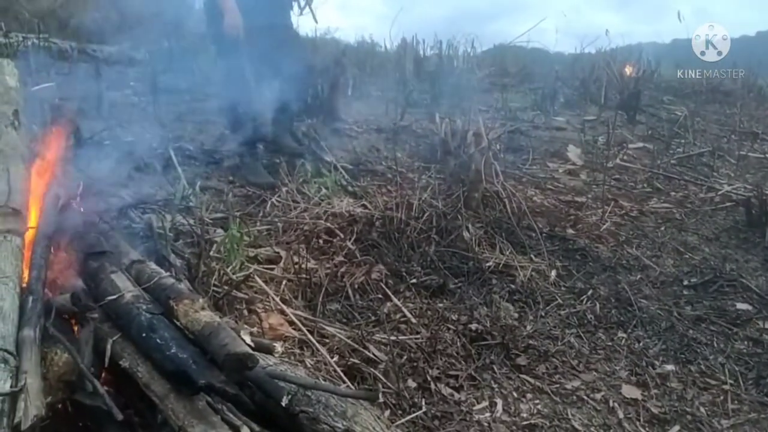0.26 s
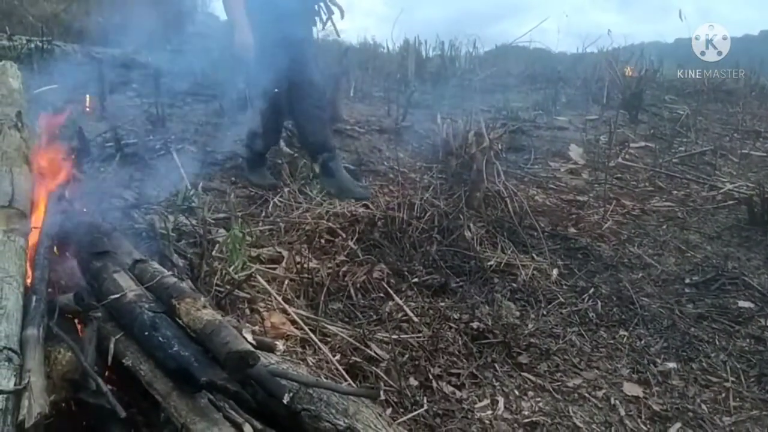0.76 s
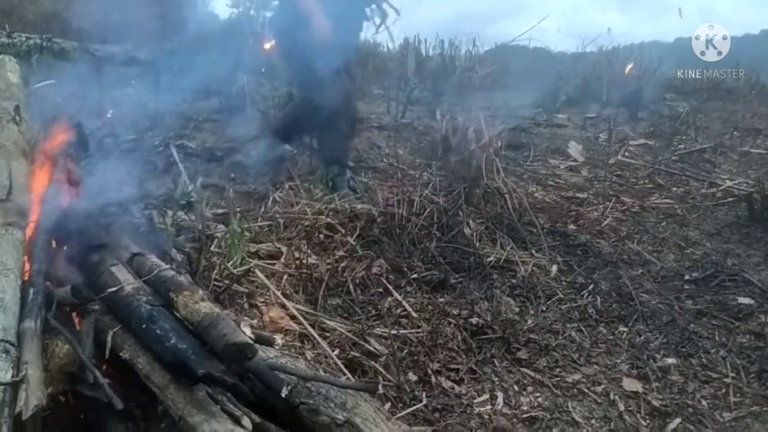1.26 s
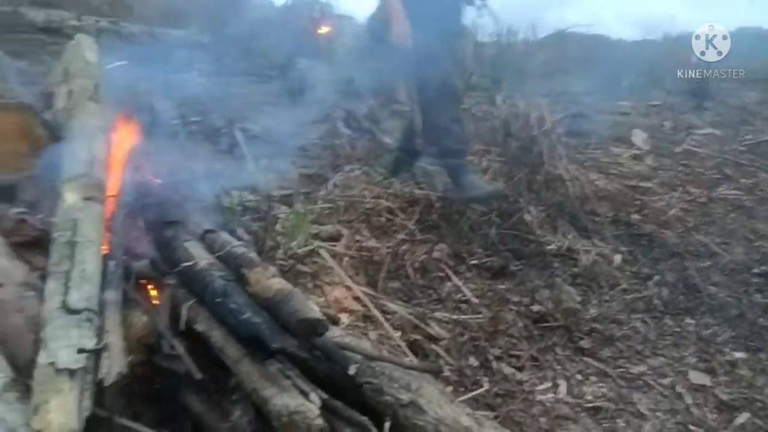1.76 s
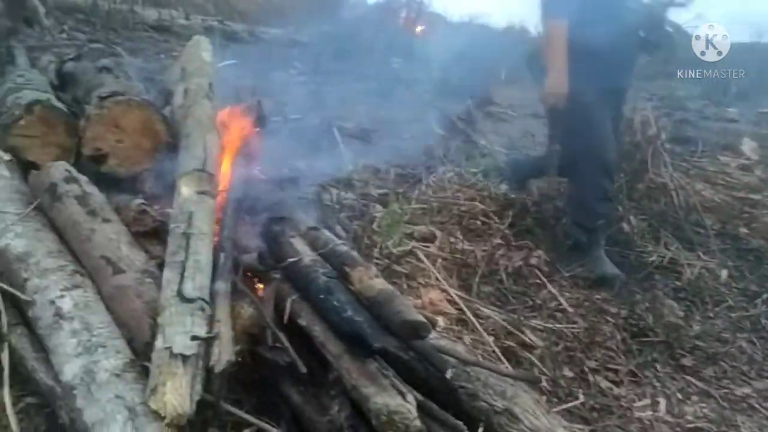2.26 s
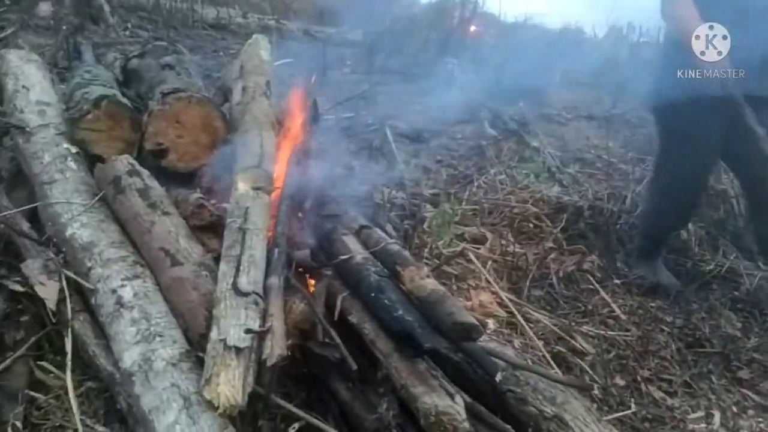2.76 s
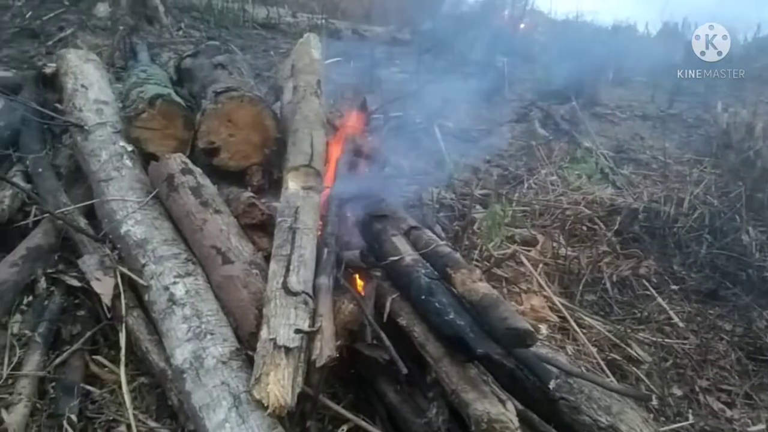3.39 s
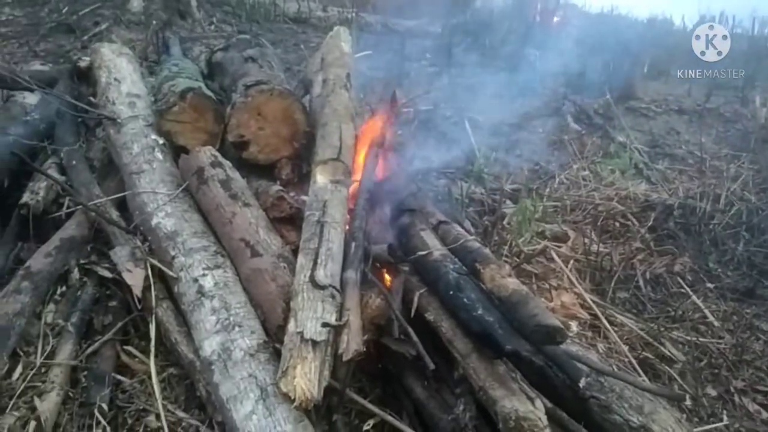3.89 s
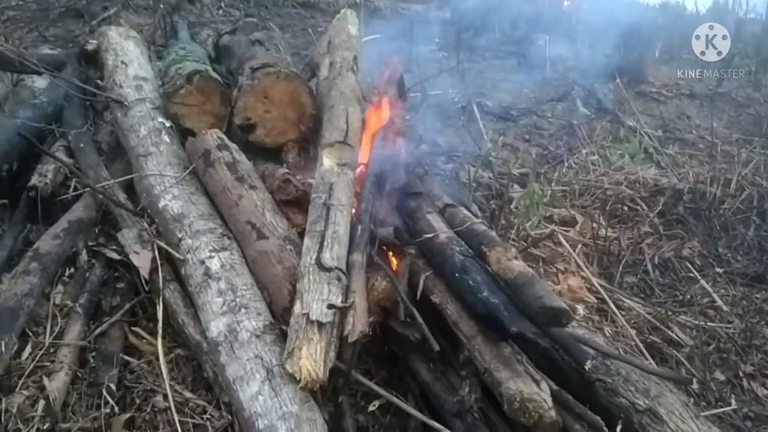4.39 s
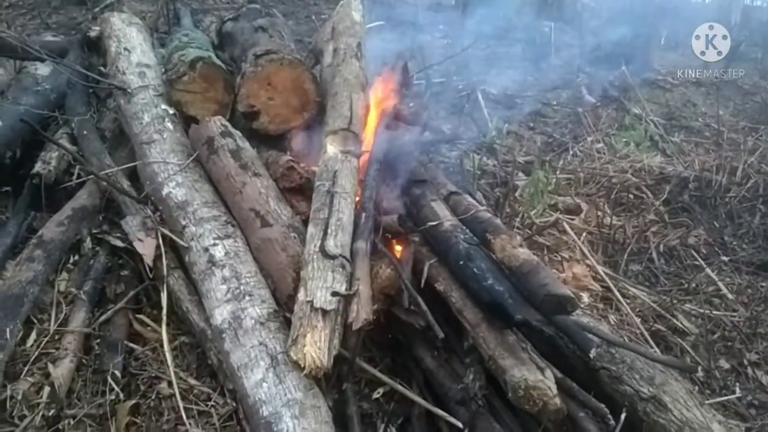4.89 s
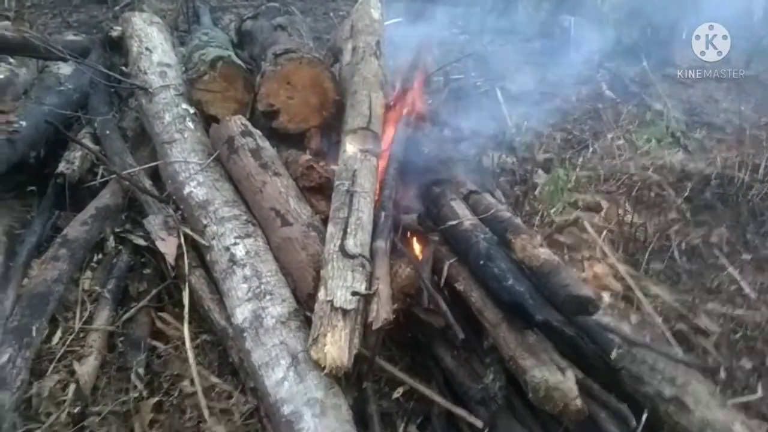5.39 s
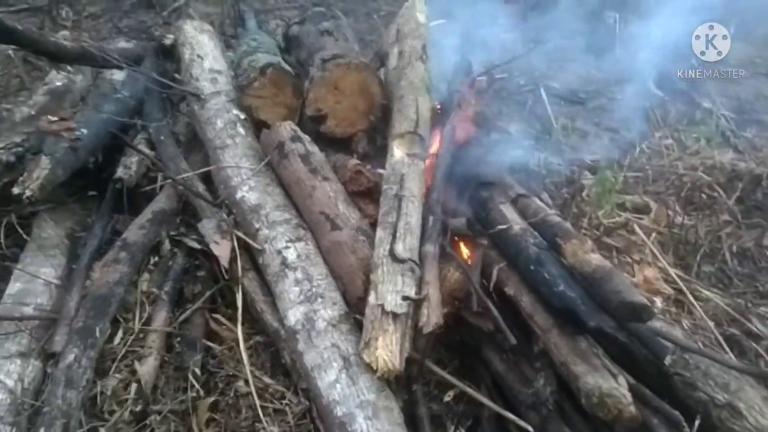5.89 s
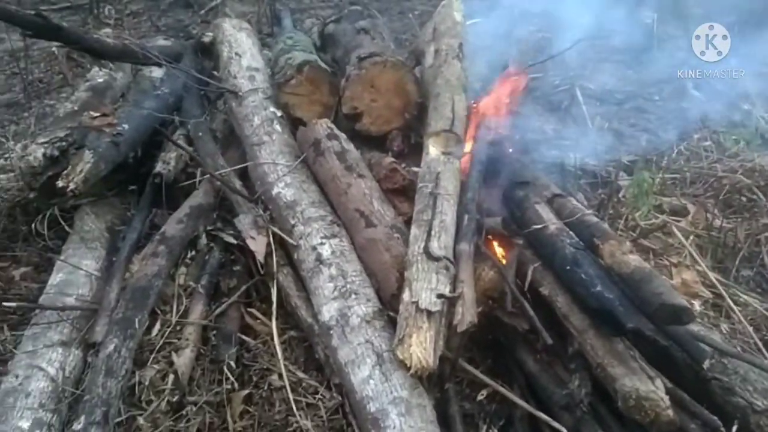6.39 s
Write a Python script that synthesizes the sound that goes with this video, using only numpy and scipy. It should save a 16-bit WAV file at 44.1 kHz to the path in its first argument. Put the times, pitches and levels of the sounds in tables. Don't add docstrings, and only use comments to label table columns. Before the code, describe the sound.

Several near cicadas buzz from the start over a distant chorus, each phrase starting high and sagging slightly. Boots brush dry twigs a few steps away; a hard stick snap cracks just after one second, and a thick crunchy rustle follows past two. Later snaps are scattered and lighter. A log fire rumbles low and fizzes faintly. Open field, hand-held stereo phone, with small finger taps on its left side near the beginning and end.

```python
import sys
import numpy as np
from scipy import signal
from scipy.fft import rfft, irfft
from scipy.io import wavfile
from scipy.ndimage import uniform_filter1d

SR = 44100
rng = np.random.default_rng(int(sys.argv[2]) if len(sys.argv) > 2 else 0)


def output_pcm(signal):
    pcm = np.clip(np.atleast_2d(signal).T, -1, 1) * 32767
    wavfile.write(sys.argv[1], SR, np.round(pcm).astype(np.int16))


def ratio_of_db(decibels):
    return 10 ** (np.asarray(decibels, float) / 20)


N = 293265

# frequency in Hz, level in dB
BELLY = [(2900, -62), (3400, -30), (3560, -6), (3650, 2), (4500, 2.5), (4620, 0.5), (5000, -53)]


def curve(table):
    s, *columns = np.transpose(table)
    return [np.interp(np.arange(N) / SR, s, c) for c in columns]


def on_log(points, hz):
    point_hz, value = np.array(points)[:, 0], np.array(points)[:, 1]
    return np.interp(np.log(hz + 1), np.log(point_hz), value)


def colour(x, points):
    y = irfft(rfft(x) * ratio_of_db(on_log(points, np.fft.rfftfreq(N, 1 / SR))), N)
    return y / np.sqrt(np.mean(y ** 2))


def walk(rate):
    k = int(SR / rate)
    held = np.repeat(rng.standard_normal(N // k + 1), k)
    return 1.3 * uniform_filter1d(uniform_filter1d(held, k), k)[:N]


def sides(db, pan_db):
    return ratio_of_db(db + np.array([[.5], [-.5]]) * pan_db)


def scatter(x, t60, wet_db):
    t = np.arange(int(t60 * SR)) / SR
    tail = rng.standard_normal((2, len(t))) * ratio_of_db(-60 * t / t60)
    tail *= ratio_of_db(wet_db) / np.sqrt(np.sum(tail ** 2, axis=1, keepdims=True))
    return x + signal.fftconvolve(x, tail, axes=1)[:, :N]


def add(out, s, burst):
    i = int(s * SR)
    out[:, i:i + burst.shape[1]] += burst[:, :N - i]


def bursts(s, peak_db, rise_s, fall_s, hold_s=0, rest_db=-120):
    t = np.arange(0, N + 64, 64)[:, None] / SR
    climb = 10 * np.maximum(s - t, 0) / np.maximum(rise_s, .005)
    decay = 10 * np.maximum(t - s - hold_s, 0) / np.maximum(fall_s, .005)
    power = np.sum(ratio_of_db(peak_db - climb - decay) ** 2, axis=1) + ratio_of_db(rest_db) ** 2
    return np.interp(np.arange(N) / SR, t[:, 0], 10 * np.log10(power))


def tymbal(hz, cycles, ring, offset=0, second_db=-60):
    cycles = int(cycles)
    strokes = np.cumsum(hz) / SR / cycles + rng.random()
    main = np.exp(-(strokes % 1) / ring)
    second = np.exp(-(strokes % 1) / 0.17) * ratio_of_db(second_db - 5.0)
    modes = main * np.sin(2 * np.pi * cycles * strokes)
    modes += second * np.sin(2 * np.pi * (cycles + round(offset)) * strokes)
    return np.sqrt(2) * modes / np.mean(main)


def phrases(start, first, last, levels_db, sag):
    start, t = np.array(start), np.arange(N) / SR
    k = np.clip(np.searchsorted(start, t) - 1, 0, len(start) - 2)
    since, until = t - start[k], start[k + 1] - t
    done = since / (since + until)
    fall = (1 - np.exp(-done / sag)) / (1 - np.exp(-1 / sag))
    db = np.resize(levels_db, len(start))[k] - 2 * done
    db = db - 18 * np.exp(-since / 0.018) - 22 * np.exp(-until / 0.049)
    return first + (last - first) * fall, db


def near_cicadas():
    tymbals = [(57, -1, .7), (55, 2, .3), (51, -3, .3), (52, -2, .3), (56, 1, .4)]
    # ring share of a stroke, second mode in dB, left minus right in dB
    strokes = [
        (0.46, -6.5, -10),
        (0.38, -15, 12),
        (0.49, -10, -5.5),
        (0.6, -25, 9),
        (0.33, -5, 14.5),
    ]
    # first pitch of every phrase in Hz, last pitch in Hz
    sag_hz = [
        (4282, 4253),
        (4139, 4098),
        (3822, 3781),
        (3924, 3909),
        (4270, 4253),
    ]
    # one singer's phrase starts in seconds, the last only ending a phrase
    starts_s = [
        [-.6, .28, 1.38, 2.08, 2.94, 4.07, 4.78, 5.8, 6.75],
        [-.6, .5, 1.45, 1.9, 2.88, 4.02, 4.98, 6.1, 6.9],
        [-.9, .45, 1.47, 2.55, 3.4, 5.7, 6.9],
        [-.5, 1.35, 2.7, 3.7, 4.5, 5.5, 6.9],
        [-.6, .88, 1.32, 3.05, 4.05, 4.75, 5.85, 6.8],
    ]
    effort_db = [
        [-53.5, -54.5, -58.5, -53.5, -54, -56.5, -54, -60.5],
        [-58.5, -56, -58, -58, -56.5, -54, -54, -53.5],
        [-57, -53, -55, -58, -57, -54],
        [-56, -57, -60, -59, -57.5, -66],
        [-65, -55, -62, -58, -54.5, -57.5, -58],
    ]
    near = 0
    for start, pitches, levels_db, membrane, stroke in zip(starts_s, sag_hz, effort_db, tymbals, strokes):
        first, last = pitches
        cycles, offset, sag = membrane
        ring, second_db, pan_db = stroke
        hz, db = phrases(start, first, last, levels_db, sag)
        song = tymbal(hz + 1.55 * walk(25.22), cycles, ring, offset, second_db)
        near = near + song * sides(db + 0.15 * walk(8.7), pan_db)
    near = colour(scatter(near, .12, -14), BELLY) * np.std(near) * ratio_of_db(1.5)
    return np.array([near[0], np.roll(near[1], 13)])


def far_chorus():
    # time in seconds, level in dB
    swell = [(0.0, -48.5), (0.52, -46), (2.22, -42.5), (2.85, -45.5), (3.04, -49.5), (3.54, -45.5),
             (3.83, -46), (4.33, -52), (4.96, -43.5), (5.35, -50), (6.09, -50.5), (6.35, -43),
             (6.65, -49.5)]
    # frequency in Hz, level in dB per Hz
    blur = [(3000, -44), (3400, -15), (3700, -5.5), (3800, -4), (4050, 1.5), (4250, -10.5), (4400, -11.5),
            (4600, -20), (4900, -40)]
    far = np.zeros((2, N))
    for k, (pitch, start, period) in enumerate(rng.random((20, 3))):
        phrase = (np.arange(N) / SR / (.9 + .3 * period) + start) % 1
        hz = 3730 + 25 * (k + pitch) + 35 * np.exp(-phrase / .4) + .8 * walk(30)
        far[k % 2] += tymbal(hz, hz[0] / (71 + 8 * period), 0.58) * ratio_of_db(2.5 * walk(2.53))
    far = colour(far, BELLY) + ratio_of_db(-2) * colour(rng.standard_normal((2, N)), blur)
    db = np.array([np.full(N, -40.5), curve(swell)[0]])
    return far * ratio_of_db(db - 4.5)


def deep_cicada():
    # peak in seconds, level in dB
    swells = [
        (0.0, -50.5),
        (1.091, -43.5),
        (1.679, -54.5),
        (2.6, -46),
        (4.36, -47.5),
        (6.24, -47.5),
    ]
    t, peaks = np.arange(N) / SR, np.array(swells)[:, 0]
    late = t - peaks[abs(t[:, None] - peaks).argmin(axis=1)]
    hz = 3570 - 450 * np.clip(late, -.2, .2) + 12 * walk(20)
    buzz = tymbal(hz, 14, .25, -2, 3) + 9 * rng.standard_normal((2, N))
    buzz = colour(buzz, [(2200, -23.5), (2700, -12.5), (3200, 4.5), (3500, 5.5), (3800, -28.5)])
    db = bursts(*np.transpose(swells), 0.14, 0.14, 0.08, rest_db=-87)
    return buzz * sides(db - 9.0, 11)


def rustle():
    # peak in seconds, level in dB, seconds to rise 10 dB, seconds to fall 10 dB
    steps = [(.0, -54, .1, 0.5), (1.1, -44.5, 0.01, 0.12), (1.12, -45, 0.14, 0.32), (1.44, -58, 0.4, -0.2),
             (1.68, -47.5, 0.12, 0.14), (1.76, -59, -0.2, -0.3), (1.87, -55, 0.2, -0.3),
             (2.131, -56, 0.2, 0.7), (2.35, -31, 0.03, 0.06), (2.46, -47, 0.03, 0.23),
             (2.6, -50, 0.12, 0.36), (3.134, -38, 0.0649, 0.03), (3.259, -51.5, 0.33, 0.16),
             (3.76, -46.5, 0.04, 0.19), (4.36, -46.5, 0.05, 0.33), (4.53, -50, 0.25, 0),
             (4.72, -50.5, 0.22, 0.22), (4.945, -49, 0.04, 0.08), (5.1, -54, -0.5, 0.14),
             (5.233, -48.5, -0.05, 0.08), (5.6, -54, 0, 0.3), (6.3, -50, 0.08, 0.15)]
    # frequency in Hz, level in dB per Hz
    twig = [(2940, -88), (5000, -8), (5600, -10.5), (6190, -7), (8880, -2.5), (10200, -4), (11100, -5),
            (12400, 2.5), (16100, -29), (22000, -120)]
    # frequency in Hz, level in dB per Hz
    twig_body = [(300, -7), (600, -13.5), (1200, 3.5), (2000, -2.5), (3200, 7), (5000, 8), (6500, -47)]
    steam_db, steam_pan_db, step_pan_db = -60.5, 3, 1
    db = bursts(*np.transpose(steps), rest_db=steam_db) + 1.2 * walk(24)
    pan_db = step_pan_db + (steam_pan_db - step_pan_db) * np.minimum(ratio_of_db(steam_db - db), 1)
    hit = rng.random(N) < .06
    strength_db = 2.7 * np.minimum(rng.exponential(size=N), 3.3)
    grains = hit * rng.standard_normal(N) * ratio_of_db(strength_db)
    grains = scatter(grains[None] / np.std(grains), 0.02, 11.0) + 1.8 * rng.standard_normal((2, N))
    bright = colour(grains, [(4000, -26.0)] + twig + [(12600, -50)])
    body = colour(grains, twig_body)
    body_db = -59 + 0.49 * (db + 49.0)
    return bright * sides(db, pan_db) + body * sides(body_db, 0.14 * pan_db)


def snaps():
    # start in seconds, peak in dB, body in dB
    breaks = [(1.0157, -35, -66), (1.087, -17, -49), (1.099, -5.5, -39), (1.1068, -20, -50),
              (1.133, -26, -56), (1.168, -20, -44.5), (1.198, -26, -69), (1.255, -21, -48.5),
              (1.2795, -22.5, -61), (1.3533, -24, -47), (1.406, -31, -74), (1.4668, -17, -45),
              (1.753, -26, -60), (2.1366, -27.5, -72), (2.3359, -19, -51), (2.3533, -18, -52),
              (2.3564, -17, -51), (2.325, -21, -57), (2.3434, -18, -60), (2.3699, -19, -56),
              (2.469, -28, -61), (2.438, -26, -72), (3.139, -29, -56), (1.2225, -30, -65),
              (2.434, -24, -71), (2.461, -25, -60), (2.3872, -26, -55), (3.11, -24, -61), (3.13, -28, -54),
              (3.818, -26, -72), (3.841, -30, -72), (3.9, -14, -74), (4.6762, -27, -62), (4.952, -24, -69),
              (5.0852, -34, -64), (2.678, -30, -65), (6.313, -24, -79), (0.9537, -36, -70),
              (1.5554, -37, -74), (1.768, -28, -69), (1.8561, -34, -58.5), (2.594, -29, -66),
              (3.7307, -27, -56), (4.3993, -35, -65), (4.71, -37, -66), (4.7295, -30, -75),
              (4.755, -30, -75), (4.9328, -29, -68), (5.232, -39, -57.5)]
    crack, body = np.zeros((2, 2, N))
    t = np.arange(600) / SR
    for (s, db, body_db), noise in zip(breaks, rng.standard_normal((len(breaks), 2, 600))):
        ms = max(1.96 * ratio_of_db(-0.1 * (db + 24)), .5)
        pan_db = 3 + 2 * noise[0, -1]
        splinter = np.exp(-(1000 * t / ms) ** 2) + 0.12 * np.exp(-t / 0.011)
        add(crack, s, noise * np.minimum(t / 0.0007, 1) * splinter * sides(db - 6.5, pan_db))
        add(body, s, noise[0] * np.exp(-t / 0.0026) * sides(body_db + 11.5, 0.12 * pan_db))
    crack = signal.sosfilt(signal.butter(4, 7900, "high", fs=SR, output="sos"), crack)
    body = signal.sosfilt(signal.butter(2, (500, 3600), "band", fs=SR, output="sos"), body)
    return scatter(crack + body, .04, -11)


def knocks():
    # start in seconds, peak in dB, pitch in Hz, left minus right in dB
    sticks = [(1.098, -49, 1780, -1), (1.129, -44.5, 1150, -4.5), (1.1295, -50, 800, -2),
              (1.256, -56, 550, -2), (1.352, -45, 967, 3), (1.3525, -47, 1350, 2), (1.467, -50, 700, 0),
              (1.3529, -35.5, 2700, 10), (1.466, -50, 1660, 14), (1.4669, -28.5, 2900, 6),
              (1.665, -54, 850, .5), (1.6697, -44.5, 2780, 10), (1.969, -42, 3000, -2),
              (1.9695, -49, 2000, -3), (1.97, -51, 1390, 0), (4.1415, -53, 1860, -9),
              (2.945, -52, 2200, -8), (2.315, -55, 305, 2), (4.39, -50, 2300, 10), (2.297, -53, 182, 2),
              (2.345, -44, 1150, 1), (2.372, -44.5, 1240, -2), (3.455, -48.5, 308, .5),
              (3.469, -62, 412, 1.5), (4.141, -42, 2660, 2), (4.651, -50.5, 258, 3), (4.699, -56, 422, 0),
              (5.045, -53, 315, -1), (6.259, -60, 396, -4)]
    out, t = np.zeros((2, N)), np.arange(3000) / SR
    for s, db, hz, pan_db in sticks:
        mode = np.sin(2 * np.pi * hz * t) * np.exp(-t * hz / 3.94)
        add(out, s, mode * sides(db, pan_db))
    return out


def taps():
    # start in seconds, peak in dB, tick in dB
    touches = [
        (0.134, -50, -39),
        (0.171, -50.5, -45),
        (0.37, -47.5, -32.5),
        (5.605, -43, -33),
        (5.642, -48, -42),
        (5.658, -46.5, -51),
        (5.679, -46, -38),
        (5.7808, -45.5, -34),
    ]
    out, t = np.zeros((2, N)), np.arange(900) / SR
    push = -np.cos(2 * np.pi * 230 * t) * np.exp(-t / 0.0011) * (1 - np.exp(-t / 0.00017)) ** 2
    push += 0.1 * np.sin(2 * np.pi * 120 * t) * np.exp(-((t - 0.008) / 0.004) ** 2)
    for (s, db, tick_db), noise in zip(touches, rng.standard_normal((len(touches), 900))):
        tick = np.diff(noise * np.exp(-t / 0.00037), n=2, prepend=[0, 0]) / 2
        add(out, s + 0.00048, (ratio_of_db(db + 4.5) * push + ratio_of_db(tick_db) * tick) * sides(2.1, 25.3))
    return out


def fizz_db():
    # start in seconds, peak in dB, hold in seconds
    boils = [(-.02, -75, 0.037), (0.216, -68, 0.098), (1.097, -82, .01), (1.341, -71, 0.11),
             (2.065, -77.5, 0.011), (2.247, -69.5, 0.071), (3.661, -72, 0.13), (4.453, -71.5, 0.11),
             (4.66, -70.5, 0.11), (5.194, -82.5, 0.018), (5.493, -70.5, 0.15), (6.232, -76, 0.1),
             (6.43, -82, 0.18)]
    s, db, hold_s = np.transpose(boils)
    return bursts(s, db, 0.028, 0.023, hold_s)


def fizz():
    out, db, frame = 0, fizz_db(), np.arange(N) // 1024
    for hz in np.arange(12600, 15400, 340):
        band = [(hz - 180, -70), (hz - 165, 0), (hz + 165, 0), (hz + 180, -70)]
        strip = colour(rng.standard_normal((2, N)), band)
        chance = rng.standard_normal((2, N // 2048 + 1))[:, frame // 2]
        margin = .7 * np.maximum(db[frame * 1024], -84) - 25.5 + 5 * chance - abs(hz - 14700) / 120
        margin = margin + np.array([[0], [-8]])
        out = out + strip * uniform_filter1d(1. * (margin > -79), 700, axis=1)
    return out * ratio_of_db(np.clip(db, -84, -66) - 1.0)


def low_fizz():
    hiss = colour(rng.standard_normal((2, N)), [(9000, -49), (10500, -2), (11500, 5.5), (12500, -13)])
    return hiss * sides(uniform_filter1d(fizz_db(), 2000) + 11.5, 14)


def flames():
    # peak in seconds, level in dB
    flares = [(0.0, -66.5), (1.17, -63), (1.76, -62), (2.31, -67.5), (2.75, -62), (3.38, -59.5),
              (4.56, -58), (5.1, -60.5), (5.702, -62), (6.3, -58.5)]
    mid, side = rng.standard_normal((2, N))
    roar = mid + 0.15 * side * np.array([[1], [-1]])
    roar = colour(roar, [(150, -15), (300, -1.0), (600, -6.0), (1250, -12.5), (1500, -14)])
    db = bursts(*np.transpose(flares), 0.34, 0.27, rest_db=-84)
    return roar * sides(db - 3.5 + 2.5 * walk(10), 1.2)


def callers():
    # pitch in Hz, width in Hz, calls a second, first call in seconds
    voices = [
        (2600, 500, 5.8, .035),
        (7000, 400, 27.3, .012),
        (6510, 70, 10.66, .072),
        (7620, 250, 190, .0),
    ]
    # level in dB, change in dB per second, left minus right in dB
    levels = [
        (-68.5, -0.7, 16),
        (-66.5, 0.88, 9),
        (-62, -0.63, 10),
        (-56, -2.4, 5.5),
    ]
    out, t = 0, np.arange(N) / SR
    for (hz, width_hz, rate, first), (db, turn_db, pan_db) in zip(voices, levels):
        phase = ((t - first) * rate + .5) % 1 - .5
        call = np.exp(-phase ** 2 / 0.036)
        band = [(hz - 2 * width_hz, -40), (hz - width_hz / 2, 0),
                (hz + width_hz / 2, 0), (hz + 2 * width_hz, -40)]
        throat = colour(rng.standard_normal((2, N)), band)
        out = out + throat * call * sides(db + turn_db * t + 2.1 * walk(1.93), pan_db)
    return out


def bird():
    # time in seconds, pitch in Hz, level in dB
    whistle = [
        (.76, 1203, -94.5),
        (.8, 1264, -96),
        (.9, 1265, -94),
        (1.0, 1260, -87),
        (1.06, 1200, -99),
    ]
    hz, db = curve(whistle)
    return np.sin(2 * np.pi * np.cumsum(hz) / SR) * sides(db, -8)


def air():
    # frequency in Hz, level in dB per Hz
    spectrum = [(12, -42), (22, -16.5), (60, 2), (300, -3), (590, -15.5), (1250, -17), (1500, -19.5),
                (2000, -11), (2500, -7), (3200, -14.5), (5700, -5), (6700, -1.5), (8500, -4.5),
                (11600, -18.5), (13000, -8)]
    # frequency in Hz, left minus right in dB
    air_pan = [(60, 1), (1300, -2), (2400, 8), (3200, 6), (5000, 2.5), (8000, -1), (10500, 2.5),
               (12000, 12.5)]
    out, f = 0, np.fft.rfftfreq(N, 1 / SR)
    for hz in 22 * 2 ** np.arange(0, 9.6, .5):
        window = np.clip(1 - abs(2 * np.log2((f + 1) / hz)), 0, 1) ** .5
        mid, side = irfft(rfft(rng.standard_normal((2, N))) * window, N)
        apart = np.clip(.42 + hz / 2500, 0, 1)
        band = (mid + apart * side * np.array([[1], [-1]])) / np.sqrt(1 + apart ** 2)
        out = out + band * sides(0.44 * walk(1.4) + 2.2 * walk(9), on_log(air_pan, hz))
    return colour(out, spectrum) * ratio_of_db(-52.5)


def mute(x):
    # frequency in Hz, share of the time muted from 0 to 1
    muted = [(800, 0), (1200, .03), (1500, .36), (1900, .3), (2200, .12), (2500, .1), (2900, .22),
             (3250, .15), (3500, 0), (4550, 0), (4650, .2), (4900, .36), (5250, .06), (5550, .4),
             (5900, .6), (6300, .04), (8500, .08), (10500, 0)]
    hz, t, z = signal.stft(x, SR, nperseg=2048, boundary="even")
    edges = np.unique(np.r_[0, np.geomspace(40, len(hz) - 1, 95).astype(int)])
    strip = np.searchsorted(edges, np.arange(len(hz)), "right") - 1
    power = np.add.reduceat(abs(z.sum(axis=0)) ** 2, edges)
    score = np.log(power + 1e-18) + 1.2 * rng.standard_normal(power.shape)
    score = uniform_filter1d(score, 2, axis=1)
    score += .25 * t * (abs(hz[edges, None] - 4850) < 300)
    rank = score.argsort(axis=1).argsort(axis=1) / score.shape[1]
    kept = rank >= on_log(muted, hz[edges])[:, None]
    return signal.istft(z * kept[strip], SR, nperseg=2048)[1][:, :N]


def scene():
    hits = snaps() + taps()
    insects = near_cicadas() + far_chorus() + deep_cicada() + callers()
    fire = low_fizz() + flames() + air()
    field = insects + rustle() + hits + knocks() + fire + bird()
    low = signal.sosfilt(signal.ellip(12, .2, 80, 11930, fs=SR, output="sos"), field)
    ticks = np.where(abs(hits) > .15, hits, 0)
    ticks = signal.sosfilt(signal.butter(10, 15600, fs=SR, output="sos"), ticks)
    return low + fizz() + ratio_of_db(-27) * ticks


def low_pass(x):
    return signal.sosfilt(signal.butter(12, 16490, fs=SR, output="sos"), x)


def record(dry):
    # frequency in Hz, left minus right in dB
    shadow = [
        (6000, 0),
        (9500, 0),
        (11500, 8),
    ]
    pan_db = on_log(shadow, np.fft.rfftfreq(N, 1 / SR))
    shaded = irfft(rfft(dry) * sides(0, pan_db), N)
    return low_pass(mute(shaded))


dry = scene()
out = record(dry)
output_pcm(out)
```